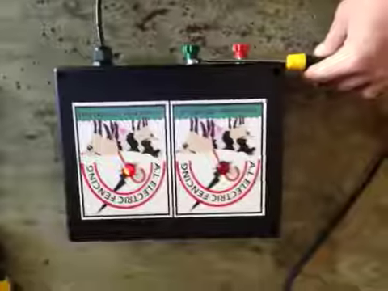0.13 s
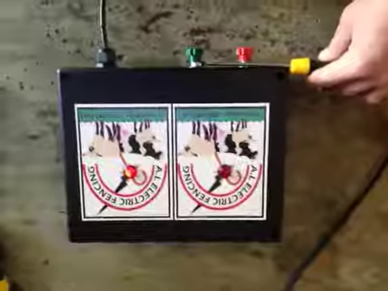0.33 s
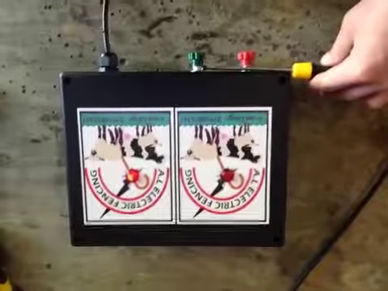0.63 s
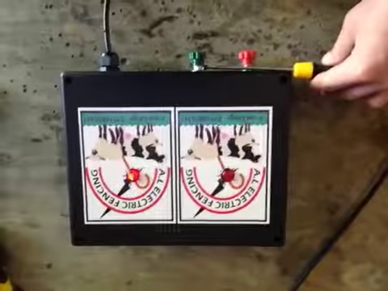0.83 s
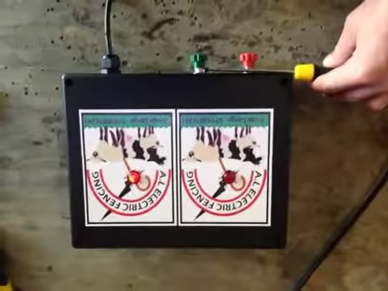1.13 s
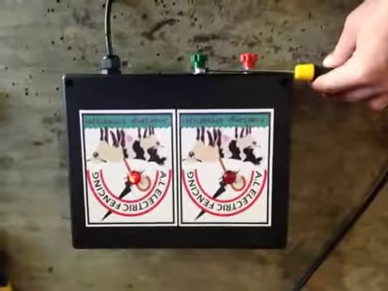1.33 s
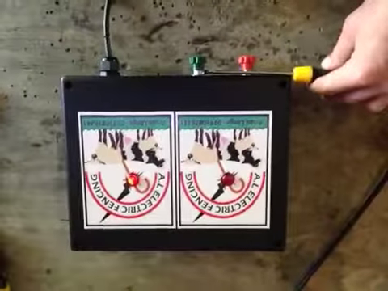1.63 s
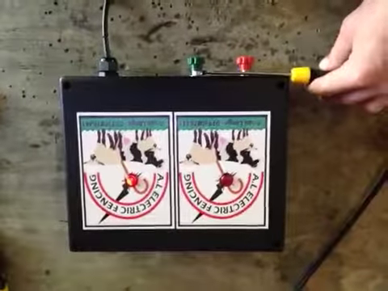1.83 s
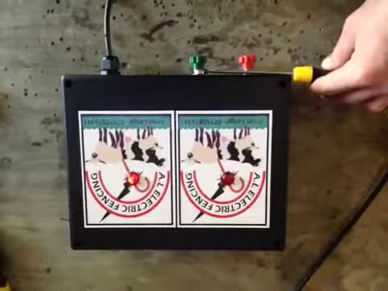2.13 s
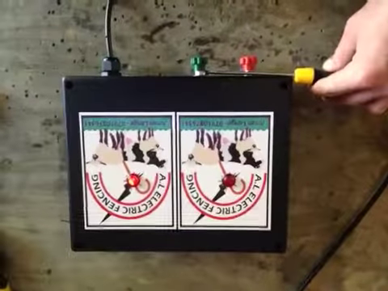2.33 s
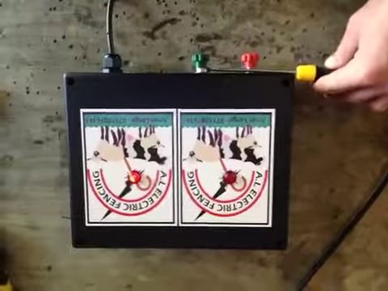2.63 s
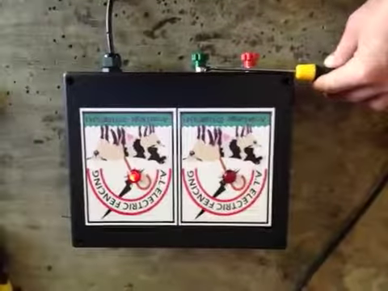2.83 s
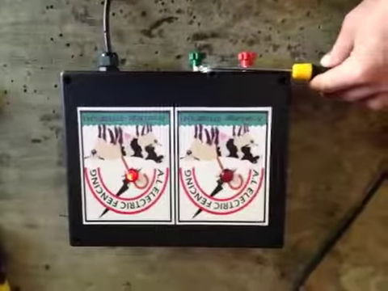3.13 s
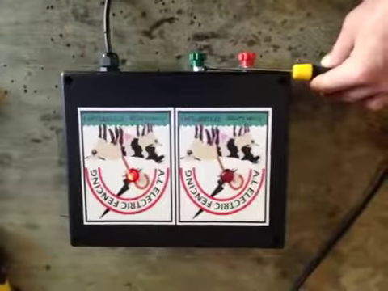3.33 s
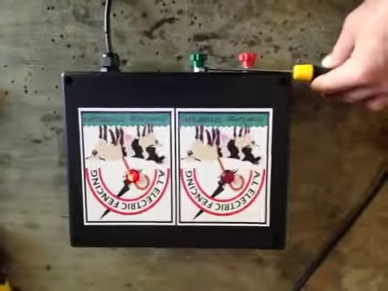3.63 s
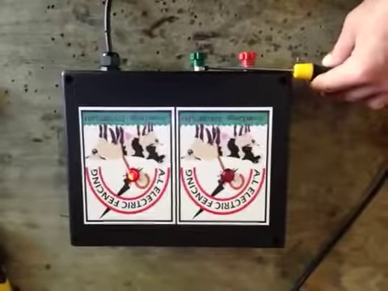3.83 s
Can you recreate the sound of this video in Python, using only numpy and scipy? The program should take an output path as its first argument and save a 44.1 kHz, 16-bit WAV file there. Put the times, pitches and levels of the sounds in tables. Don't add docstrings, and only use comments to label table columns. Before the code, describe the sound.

An electric fence energiser close to a phone microphone gives a small dry tick, then two loud spark cracks with brief shed echo; faint traffic, hiss and distant bird clucks and whistles behind, brighter chirps near the end.

```python
import sys
import numpy as np
from scipy import signal
from scipy.fft import rfft, irfft
from scipy.io import wavfile

SR = 44100
rng = np.random.default_rng(int(sys.argv[2]) if len(sys.argv) > 2 else 0)


def linear_from_db(decibels):
    return 10 ** (np.asarray(decibels, float) / 20)


def wrap_up_sound(samples):
    columns = np.atleast_2d(samples).T
    tamed = np.clip(columns, -1, 1)
    steps = np.round(tamed * 32767).astype(np.int16)
    wavfile.write(sys.argv[1], SR, steps)


N = 176400


def unit(x):
    return x / np.sqrt(np.mean(x ** 2))


def on_log(hz, table):
    table = np.array(table, float)
    return np.interp(np.log(hz), np.log(table[:, 0]), table[:, 1])


def band(hz, width, size=N):
    f = np.fft.rfftfreq(size, 1 / SR)
    bell = np.exp(-.5 * ((f - hz) / width) ** 2)
    return unit(irfft(rfft(rng.standard_normal(size)) * bell, size))


def walk(rate, size=N):
    return band(0, rate, size=size)


def ring(modes, t):
    out = 0
    for hz, db, t60 in modes:
        out = out + linear_from_db(db) * np.sin(2 * np.pi * hz * t) * linear_from_db(-60 * t.clip(0) / t60)
    return out * (t > 0)


def add(out, start, x):
    i = int(start * SR)
    out[i:i + len(x)] += x[:N - i]


# pitch [Hz], level per Hz [dB].
AIR = [(18, -49), (30, -22.5), (118, 1.5), (273, 0.5), (554, -5.5), (1720, -9.5), (2230, -9.5),
       (14000, -13), (16000, -14)]
# pitch [Hz], width [Hz], level [dB].
DRONES = [(108, 16, -83), (276.6, 50, -81.5)]
# time [s], level [dB].
TRAFFIC = [(0, 0.5), (.6, 0), (1.0, 2), (1.8, 3), (2.099, -1.5), (2.65, -0.5), (2.9, 1), (3.302, 0), (4, 1)]


def air():
    out = 0
    swell = np.interp(np.arange(N) / SR, *np.array(TRAFFIC, float).T)
    for hz in 30 * 2 ** np.arange(0, 9.3, .5):
        traffic_share = min(400 / hz, 1)
        drift_db = traffic_share * (swell + walk(7.1)) + 0.25 * walk(8)
        out = out + linear_from_db(on_log(hz, AIR) + drift_db) * hz ** .5 * band(hz, hz / 6)
    drones = sum(linear_from_db(db + swell + 0.96 * walk(1.6)) * band(hz, width / 2) for hz, width, db in DRONES)
    return linear_from_db(-68) * unit(out) + drones


def sing(hz, gain):
    return gain * np.sqrt(2) * np.sin(2 * np.pi * np.cumsum(hz) / SR)


# time [s], pitch [Hz], level [dB].
ARCHES = [
    [(3.385, 5850, -65), (3.395, 6000, -59.5), (3.399, 6350, -59), (3.404, 6870, -60), (3.42, 6850, -63),
     (3.431, 6860, -57), (3.437, 7080, -62), (3.443, 6900, -61), (3.448, 6200, -59)],
    [(3.447, 6440, -53), (3.454, 5840, -45.5), (3.463, 5980, -50.5), (3.468, 5100, -53), (3.474, 4860, -48),
     (3.478, 4020, -47.5), (3.484, 3830, -47), (3.489, 3200, -60), (3.497, 2950, -60.5)],
    [(3.555, 6080, -66), (3.562, 5770, -60), (3.568, 5860, -53), (3.574, 6570, -60), (3.58, 7330, -55),
     (3.588, 7650, -61), (3.597, 7450, -57.5), (3.601, 6840, -52), (3.604, 6600, -60)],
    [(3.602, 6670, -58), (3.611, 6800, -56.5), (3.617, 6230, -47.5), (3.622, 5600, -52.5),
     (3.625, 4820, -53), (3.633, 5000, -51.5), (3.637, 4030, -54), (3.644, 3740, -52), (3.649, 3150, -59)],
    [(3.648, 3200, -62.5), (3.655, 3120, -53.5), (3.662, 2983, -65.5), (3.672, 3000, -79.5)],
]
# time [s], pitch [Hz], level [dB].
WHISTLES = [
    [(2.103, 1933, -81), (2.118, 2220, -73), (2.132, 2272, -74), (2.142, 2249, -68.5), (2.188, 2004, -70),
     (2.244, 1927, -69), (2.27, 1850, -77)],
    [(2.53, 2500, -81.5), (2.548, 2520, -64.5), (2.578, 2430, -81), (2.608, 2398, -65.5),
     (2.728, 2206, -66.5), (2.754, 1900, -72.5), (2.765, 1944, -90.5)],
]


def sing_phrases(out, phrases, wobble):
    for rows in phrases:
        s, hz, db = np.array(rows, float).T
        u = np.arange(s[0], s[-1], 1 / SR)
        bend = 1 + wobble * walk(206, size=16384)[:len(u)]
        edge = (np.minimum(u - u[0], u[-1] - u) / 0.0018).clip(0, 1)
        add(out, u[0], sing(np.interp(u, s, hz) * bend, edge * linear_from_db(np.interp(u, s, db))))


# start [s], length [s], start pitch [Hz], end pitch [Hz], level [dB].
CHATTER = [(3.302, .007, 3700, 4700, -61), (3.305, .013, 4800, 5250, -58), (3.306, .012, 3900, 4300, -57),
           (3.315, .013, 4100, 4700, -59), (3.318, .01, 5200, 4600, -62), (3.33, .008, 5250, 4800, -66),
           (3.747, .014, 3900, 3200, -73), (3.748, .013, 2650, 2650, -66), (3.758, .024, 2400, 2300, -65),
           (3.837, .01, 3900, 3900, -57), (3.839, .033, 2980, 2620, -67), (3.845, .013, 3850, 4050, -51),
           (3.856, .011, 3950, 3850, -60), (3.857, .012, 5600, 4400, -65), (3.866, .031, 4330, 5000, -56),
           (3.873, .01, 3900, 3850, -63), (3.888, .021, 3950, 3890, -51), (3.906, .014, 4400, 4250, -49),
           (3.915, .025, 2950, 3150, -62), (3.916, .02, 5800, 6000, -67), (3.918, .012, 4400, 3700, -57),
           (3.926, .014, 5600, 4500, -59), (3.932, .02, 4200, 3900, -62), (3.935, .011, 5100, 3900, -62),
           (3.949, .006, 4000, 4100, -58), (3.952, .012, 6200, 5200, -67), (3.957, .016, 4150, 4600, -56),
           (3.965, .012, 3530, 3600, -56), (3.977, .022, 4950, 5050, -54), (3.979, .02, 3600, 3700, -62),
           (3.975, .016, 4400, 4600, -63), (3.992, .012, 4500, 3950, -53)]
# start [s], length [s], start pitch [Hz], end pitch [Hz], level [dB].
FAR = [(0.622, 0.046, 2260, 2290, -82.5), (0.685, .032, 2320, 2260, -83), (0.732, 0.052, 1790, 1900, -79.5),
       (.783, 0.028, 1980, 1980, -77), (0.804, 0.035, 2070, 2080, -83), (1.22, 0.12, 2212, 2320, -82),
       (1.325, 0.03, 2320, 1910, -79), (1.35, 0.071, 1870, 1814, -81), (1.532, 0.084, 2120, 2180, -85),
       (1.706, 0.032, 2215, 2050, -80), (1.775, 0.019, 2456, 2620, -81), (1.786, 0.05, 2580, 2560, -80.5),
       (1.842, .018, 2520, 2400, -72), (1.854, .03, 2600, 2660, -82.5), (2.073, 0.028, 2220, 2260, -79),
       (2.35, 0.071, 2970, 3060, -73.5), (2.395, .05, 2900, 2450, -73), (2.418, 0.037, 2520, 2180, -74),
       (2.781, 0.033, 2200, 2284, -82)]


def sing_notes(out, notes, rasp_hz, rasp_above_hz=0):
    for s, length, hz0, hz1, db in notes:
        u = np.linspace(0, 1, int(length * SR))
        flutter = linear_from_db(3.5 * walk(160, size=8192)[:len(u)])
        rasp = rasp_hz * (hz0 > rasp_above_hz) * walk(260, size=8192)[:len(u)]
        swell = np.sin(np.pi * u) ** 0.27
        add(out, s, sing(hz0 + (hz1 - hz0) * u + rasp, linear_from_db(db) * flutter * swell))


def cluck_voice(u, hz, multiple):
    tone = sing(multiple * hz * (1 + 0.05 * (.5 - u)), 0.71)
    return tone + linear_from_db(-5) * band(multiple * hz, hz / 2, size=4096)[:len(u)]


# start [s], first level [dB], second level [dB], pitch [Hz].
CLUCKS = [
    (0.149, -64.5, -57.5, 660),
    (2.281, -65, -56, 654),
    (2.877, -67, -55.5, 654),
]
# multiple of the pitch [times], first level [dB], second level [dB].
CLUCK_PARTIALS = [(2, 6, -4.5), (3, 4.5, -8.5), (4, 7, -13.5), (5, 1, -23.5)]


def cluck(out):
    gap_s, first_s, second_s = .038, 0.017, 0.04
    u = np.linspace(0, 1, int(first_s * SR))
    w = np.linspace(0, 1, int(second_s * SR))
    first_shape = np.sin(np.pi * u) ** 2 * (1 - u)
    second_shape = np.sin(np.pi * w ** 1.03) ** 2
    for s, db1, db2, hz in CLUCKS:
        for multiple, rel1_db, rel2_db in CLUCK_PARTIALS:
            add(out, s, cluck_voice(u, hz, multiple) * linear_from_db(db1 + rel1_db) * first_shape)
            add(out, s + gap_s, cluck_voice(w, hz, multiple) * linear_from_db(db2 + rel2_db) * second_shape)


def birds():
    near, far = np.zeros(N), np.zeros(N)
    sing_phrases(near, ARCHES, wobble=.022 * 1.15)
    sing_phrases(far, WHISTLES, wobble=.022 * 0.15)
    sing_notes(near, CHATTER, rasp_hz=100)
    sing_notes(far, FAR, rasp_hz=170, rasp_above_hz=2700)
    cluck(far)
    direct = near * linear_from_db(2.0 * walk(140)) + far * linear_from_db(0.84 * walk(34))
    lag = np.arange(8192) / SR
    yard_t60_s, yard_db = 0.1, -6
    echo = rng.standard_normal(len(lag)) * linear_from_db(-60 * lag / yard_t60_s) * (lag > .004)
    echo = echo / np.sqrt(np.sum(echo ** 2))
    return direct + linear_from_db(yard_db) * signal.fftconvolve(direct, echo)[:N]


# pitch [Hz], level per Hz [dB].
TAIL = [(170, -11), (390, -6.5), (700, -11), (1400, -12), (2550, -5.5), (3500, -12.5), (6500, -9.5),
        (14000, -18.5)]
# pitch [Hz], time to fall 60 dB [s].
TAIL_T60 = [(150, 0.25), (500, 0.079), (2000, 0.13), (6000, 0.094), (14000, 0.08)]
# pitch [Hz], level [dB], time to fall 60 dB [s].
CASE = [(336, 2, 0.055), (1220, -2.5, .05), (1468, 2, 0.036), (1813, -6.5, .05), (2120, -4, 0.063),
        (2380, -3, 0.08), (2564, -3.5, .07), (2735, -3, .06), (2910, -16.5, .06), (4520, -5.5, 0.066),
        (4740, -4, 0.041), (5160, -6, 0.023), (5600, -3.5, 0.062), (6900, -6, .04)]


def shed(t, case_db, tilt_db=0):
    early_db, early_t60_s, rise_s = 15, 0.0083, .0015
    tail = 0
    for hz in 150 * 2 ** np.arange(0, 6.8, .5):
        fall = linear_from_db(-60 * t / on_log(hz, TAIL_T60)) + linear_from_db(early_db - 60 * t / early_t60_s)
        level_db = on_log(hz, TAIL) + tilt_db * np.log2(hz / 1000)
        tail = tail + linear_from_db(level_db) * hz ** .5 * band(hz, hz / 6, size=len(t)) * fall
    tail = tail / np.sqrt(np.mean(tail[:441] ** 2))
    tail = tail + linear_from_db(case_db) * ring(CASE, t)
    return tail * (t / rise_s).clip(0, 1) ** 2


# start [s], level [dB].
TICKS = [
    (.5619, -38),
    (.5634, -39),
]
# pitch [Hz], level [dB], time to fall 60 dB [s].
CORE = [(3720, 12.5, 0.0036), (2950, 7, 0.0057), (1960, -3, 0.019), (2500, -8, 0.055), (1450, -3.5, 0.019),
        (1080, 5, 0.018), (304, -8, 0.1)]


def transformer_tick(out, t):
    rise_s = .0002
    for s, db in TICKS:
        add(out, s, linear_from_db(db) * ring(CORE, t) * (t / rise_s).clip(0, 1) / 2)
    add(out, TICKS[0][0], linear_from_db(-44.5) * shed(t, case_db=-31, tilt_db=-1.5))


# pitch [Hz], level [dB], time to fall 60 dB [s].
SPARK = [(10840, 0, .0013), (6810, 6.4, .00064)]
# delay [s], gain [times].
BOUNCES = [
    (0, 1),
    (.000186, .31),
    (.000392, -.42),
]


def spark_crack(t):
    return sum(gain * ring(SPARK, t - lag) for lag, gain in BOUNCES)


def case_flex(t, flex_db, recoil_t60_s):
    flex_s, recoil_hz, push_s = .000128, 700, .00044
    flex = t / flex_s * np.exp(-.5 * (t / flex_s) ** 2)
    recoil = push_s / recoil_t60_s * ring([(recoil_hz, 0, recoil_t60_s)], t)
    return linear_from_db(flex_db) * flex - recoil


# start [s], spark [dB], case flex [dB], echo [dB], time for the case recoil to fall 60 dB [s].
PULSES = [
    (1.897993, -8.5, -7.3, -26, .0023),
    (3.234498, -7.9, -6, -24.5, .00084),
]


def energiser():
    out, t = np.zeros(N), np.arange(8192) / SR
    transformer_tick(out, t)
    buzz_s, buzz_db, buzz_hz = 0.0053, -27, 1770
    buzz_size = int(buzz_s * SR)
    for s, spark_db, flex_db, tail_db, recoil_t60_s in PULSES:
        u = t - s * SR % 1 / SR
        crack = linear_from_db(spark_db) * spark_crack(u)
        flex = case_flex(u - .00064, flex_db, recoil_t60_s)
        echo = linear_from_db(tail_db + 0.24) * shed(t, case_db=-7.5)
        add(out, s, crack + flex + echo)
        buzz = band(buzz_hz, 1100, size=1024)[:buzz_size]
        add(out, s - buzz_size / SR, linear_from_db(tail_db + buzz_db) * buzz)
    mic_low = signal.butter(4, 261, "high", fs=SR, output="sos")
    mic_top = signal.butter(12, 15000, fs=SR, output="sos")
    return signal.sosfiltfilt(mic_top, signal.sosfilt(mic_low, out))


def scene():
    hiss_top = signal.ellip(10, .2, 70, 15450, fs=SR, output="sos")
    background = signal.sosfilt(hiss_top, air() + birds())
    return (background + energiser())[None]


def band_limit(x):
    return signal.sosfilt(signal.butter(12, 16500, fs=SR, output="sos"), x)


def record(dry):
    start_s, fade_s = 0.0822, 0.0032
    leak = linear_from_db(-44) * np.roll(dry, -512, axis=1)
    opening = ((np.arange(N) / SR - start_s) / fade_s).clip(0, 1)
    return band_limit((dry + leak) * opening)


dry = scene()
out = record(dry)
wrap_up_sound(out)
```